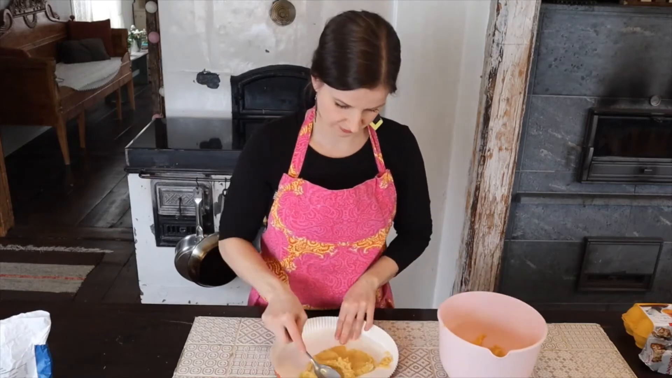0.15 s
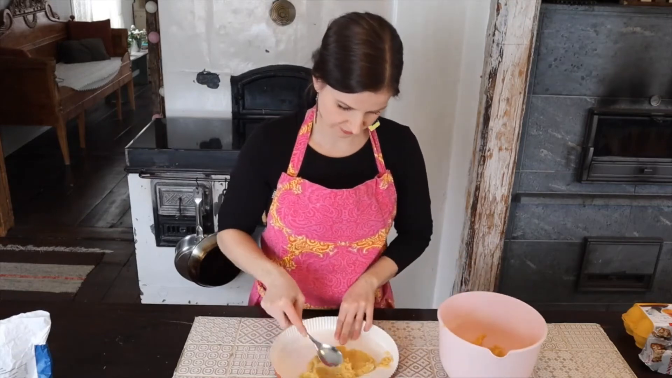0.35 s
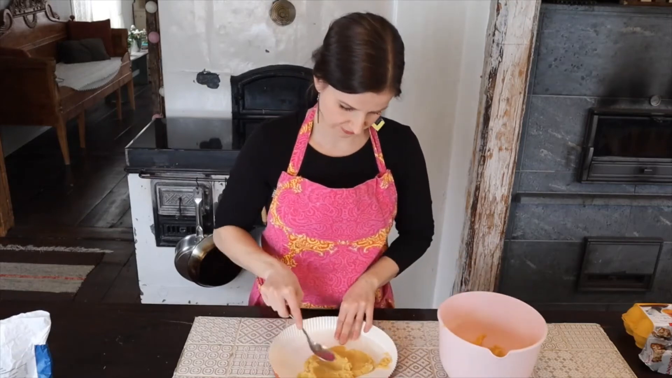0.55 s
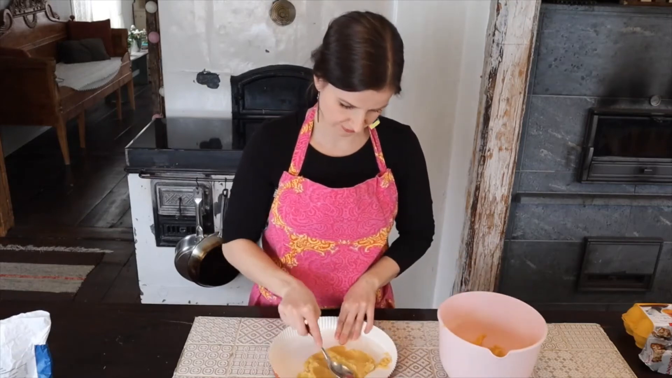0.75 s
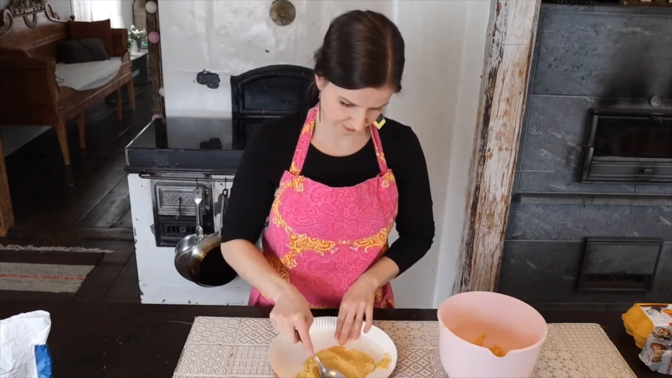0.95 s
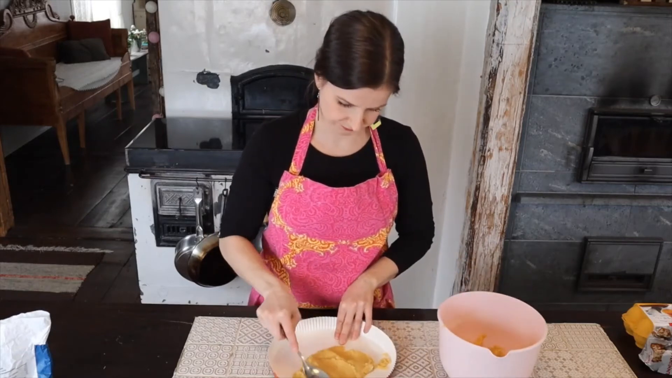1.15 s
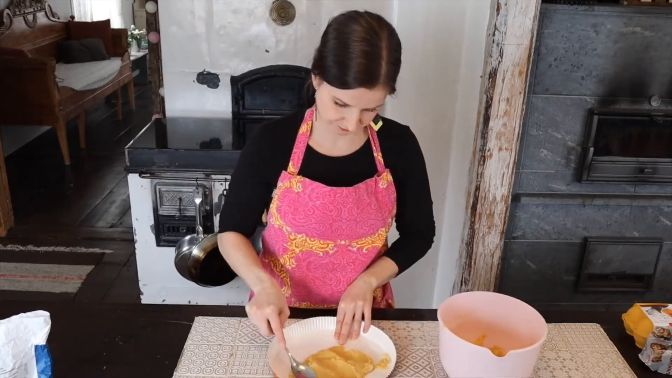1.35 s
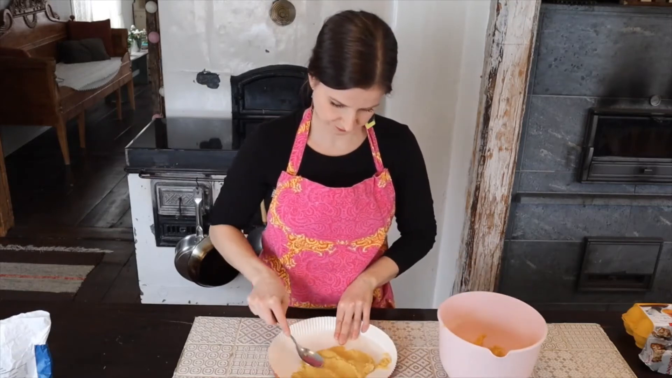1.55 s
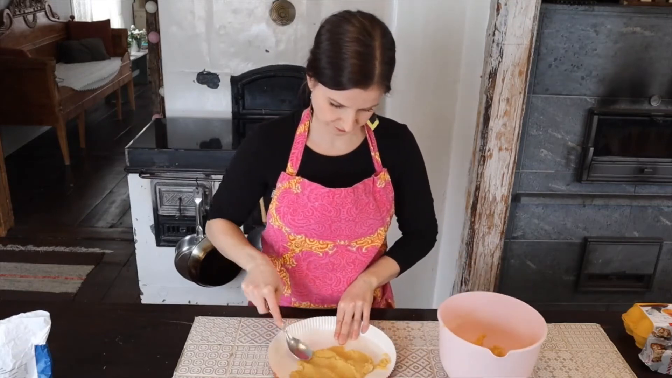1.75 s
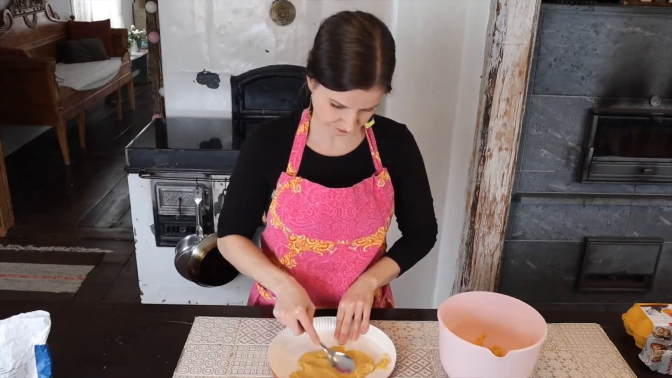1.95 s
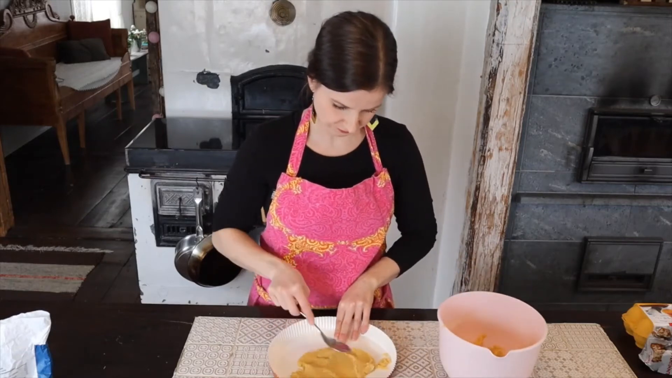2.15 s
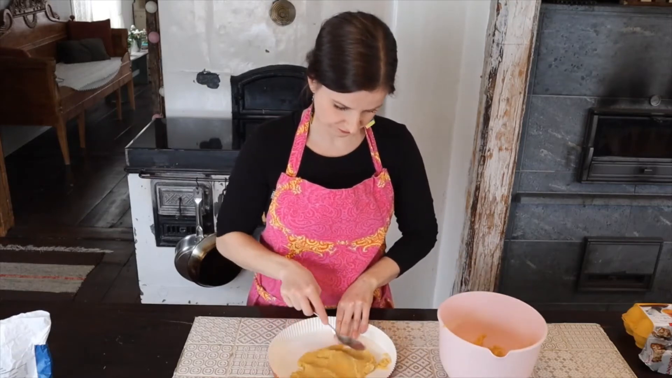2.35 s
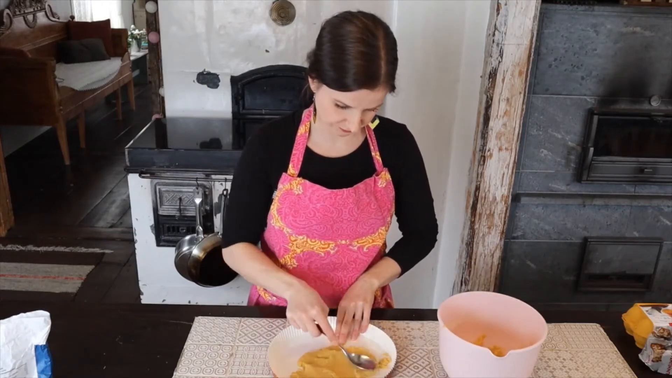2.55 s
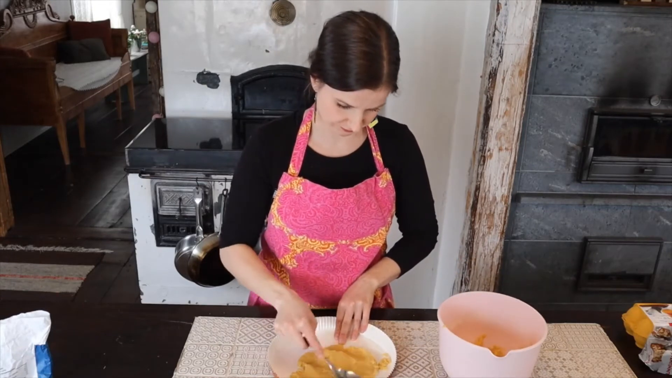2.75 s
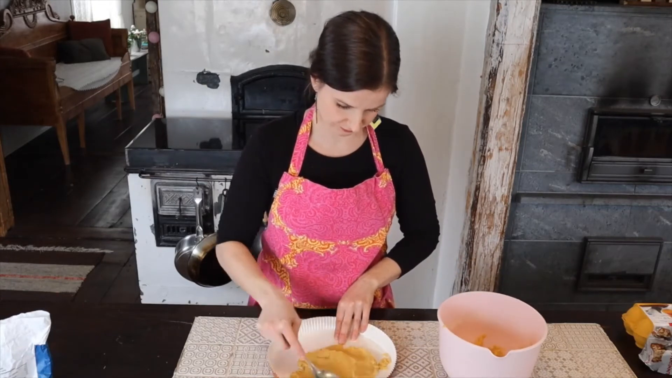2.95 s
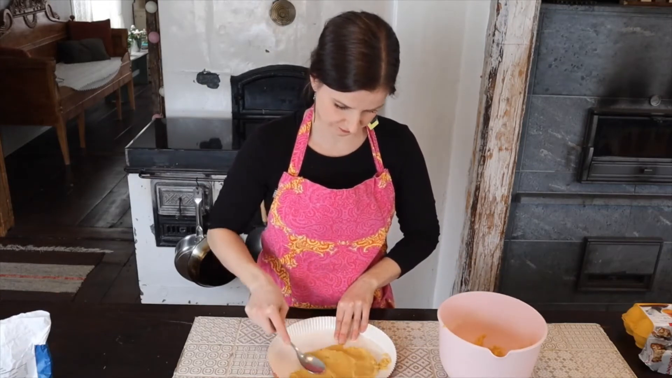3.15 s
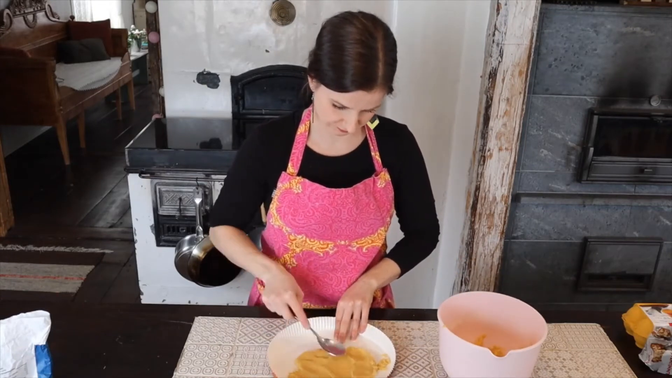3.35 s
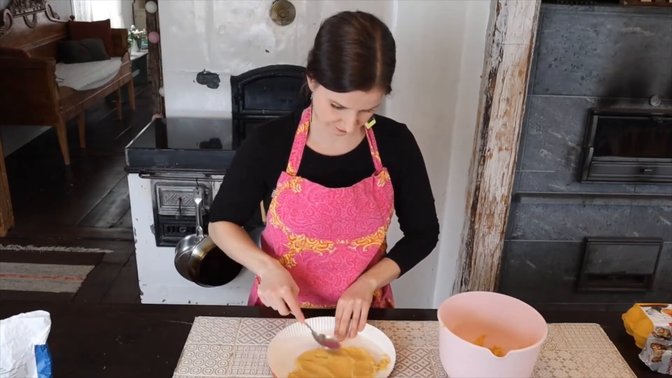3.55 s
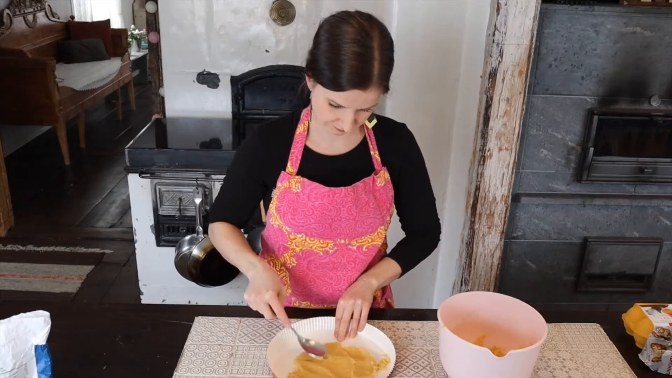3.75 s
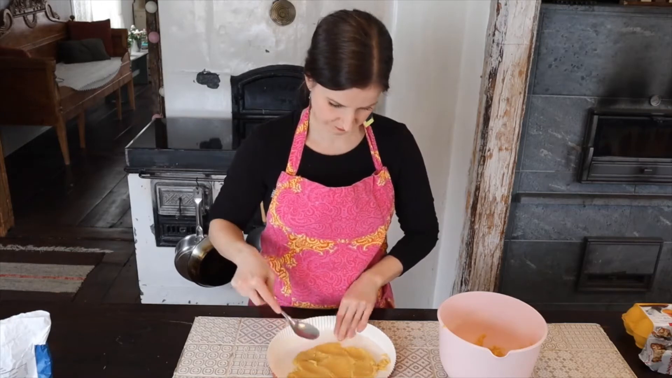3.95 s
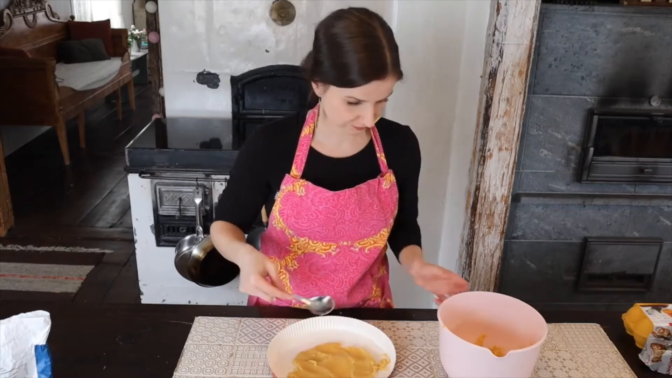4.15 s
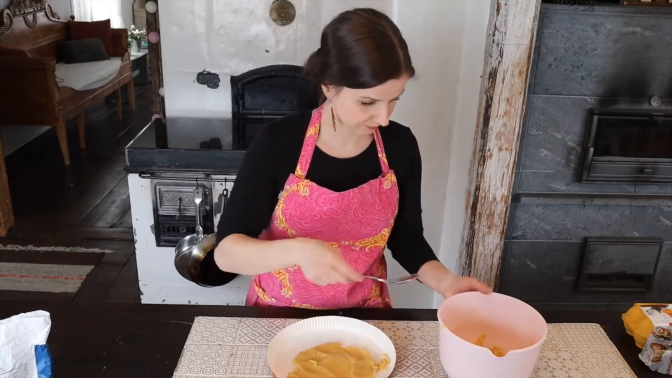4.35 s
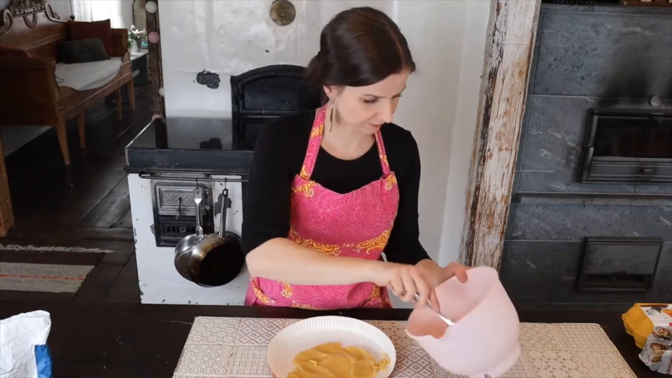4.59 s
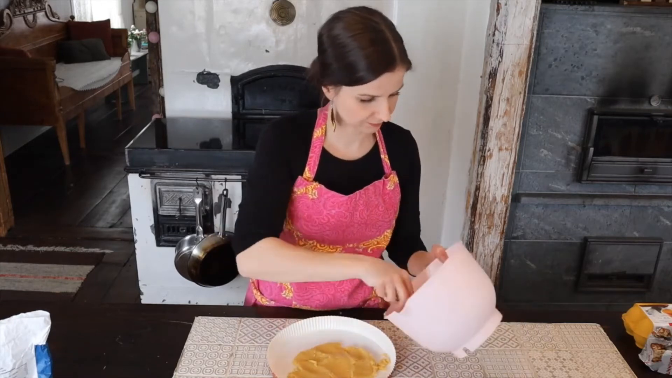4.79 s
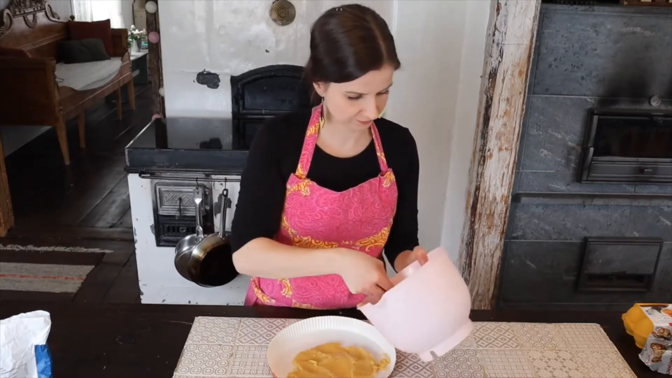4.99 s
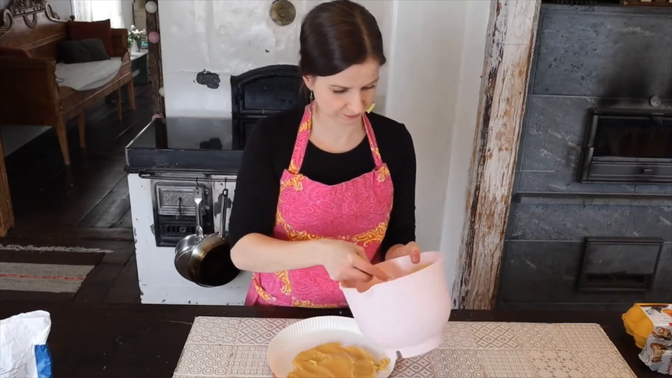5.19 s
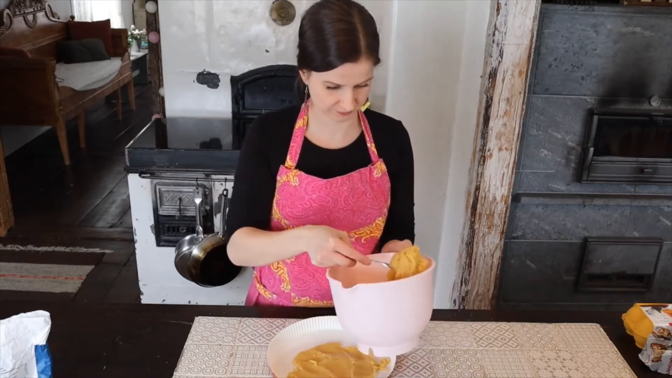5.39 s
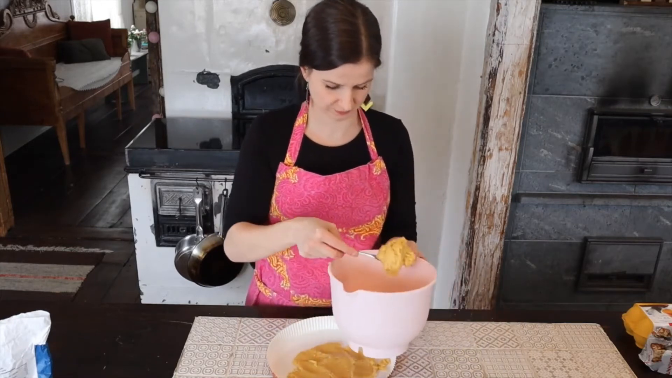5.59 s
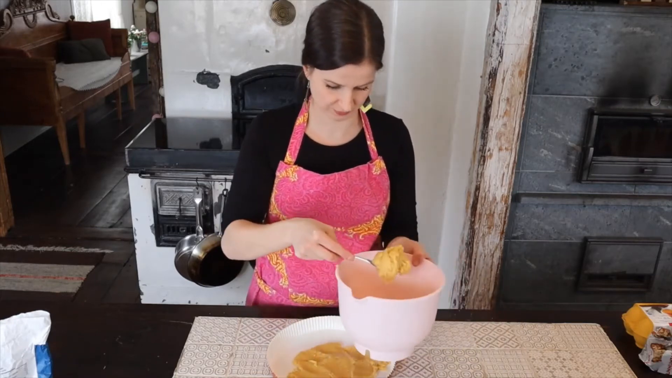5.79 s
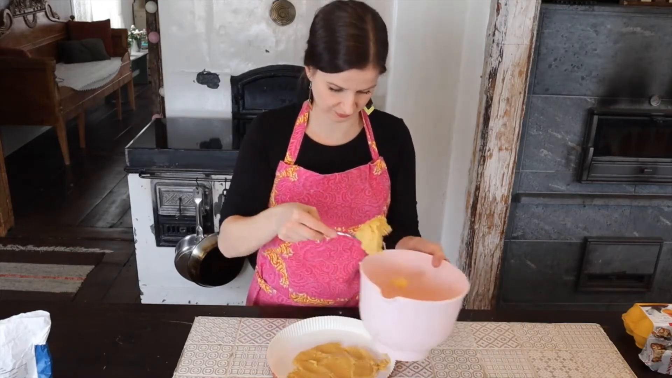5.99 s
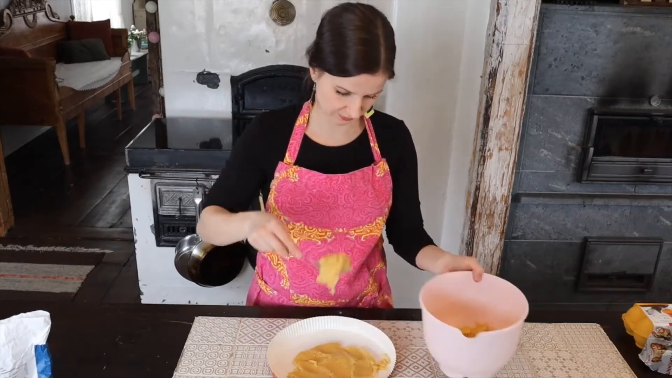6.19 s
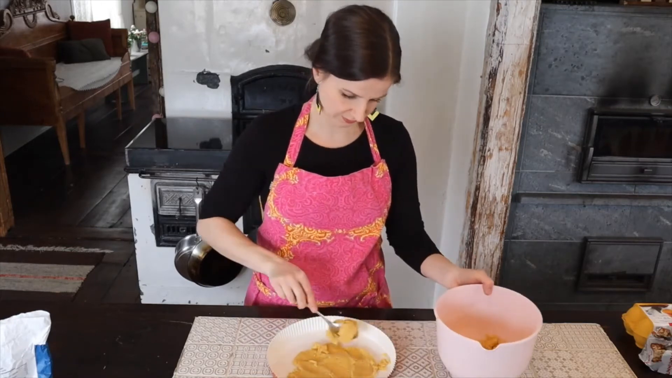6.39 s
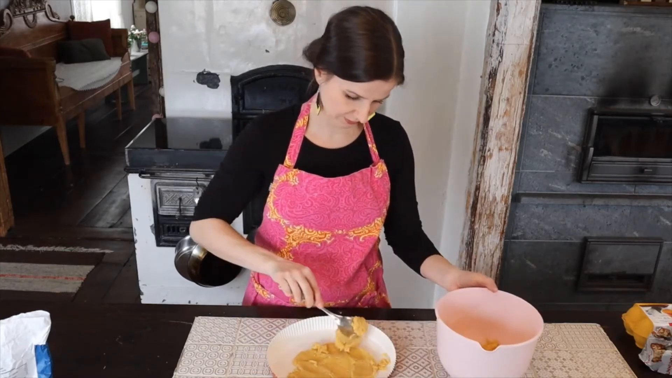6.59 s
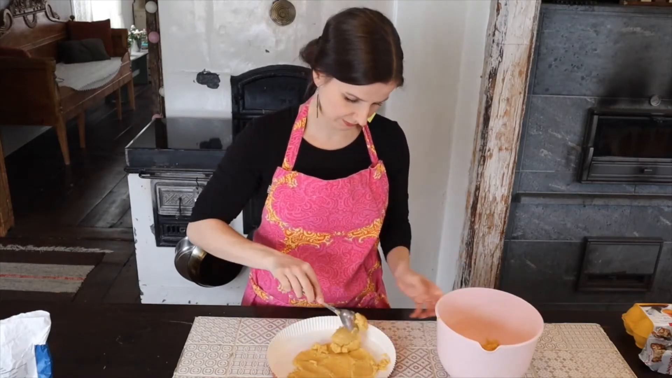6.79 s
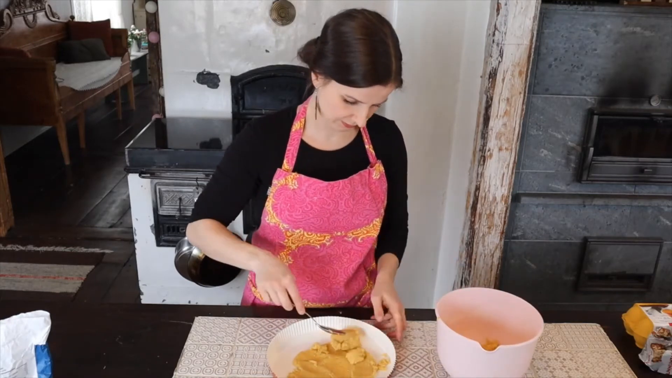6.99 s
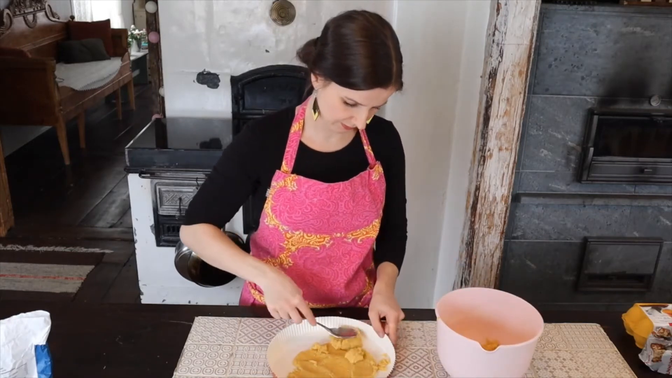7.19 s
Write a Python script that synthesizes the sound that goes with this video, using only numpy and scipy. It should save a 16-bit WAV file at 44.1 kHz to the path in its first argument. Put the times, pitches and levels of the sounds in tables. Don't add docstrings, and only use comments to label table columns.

```python
import sys
import numpy as np
from scipy import signal
from scipy.fft import rfft, irfft, next_fast_len
from scipy.io import wavfile
from scipy.ndimage import uniform_filter1d

SR = 44100
rng = np.random.default_rng(int(sys.argv[2]) if len(sys.argv) > 2 else 0)


def bounce(signal):
    frames = np.transpose(np.atleast_2d(signal))
    limited = np.clip(frames, -1, 1)
    pcm = np.round(limited * 32767).astype(np.int16)
    wavfile.write(sys.argv[1], SR, pcm)


def volts(x):
    e = np.asarray(x, float) / 20
    return 10 ** e


N = 318843
TIME = np.arange(N) / SR

# t/s, peak level/dB, body re peak/dB, click re peak/dB,
# share of the free ring time left by dough and hand/1
KNOCKS = [(0.2541, -32, 9.5, -6.5, 0.32), (0.6993, -44.5, -33, -8, 0.25), (0.8445, -32, -15, -0.5, 0.69),
          (0.849, -27, -10.5, -16, 0.47), (1.0832, -18, -8.5, -11.5, 0.78),
          (1.0924, -20.5, -10, -27.5, 0.86), (1.1065, -36, -16, -28, 0.39),
          (1.1215, -26.5, -0.5, -28.5, 0.38), (1.134, -30, -13, -28, 0.52), (1.1845, -28, -28, -40.5, 0.52),
          (1.503, -15.5, -32, -9.5, 0.017), (2.3659, -57.5, -19, 1.5, 1.4), (2.4541, -42, -8, -11, 0.19),
          (2.5882, -34, -2, 1, 0.27), (2.7334, -45.5, -38, 14, 0.42), (2.9132, -26.5, -10, -6.5, 0.4),
          (3.2999, -36.5, -4.5, -4, 0.37), (3.3184, -31, -10, -11, 0.2), (3.5413, -43, -7, -10, .32),
          (3.5883, -39.5, -16, -6, 0.16)]
# t/s, peak level/dB, f/Hz, decay time/s
STICKY_TICKS = [(0.4658, -49, 4200, 0.026), (0.779, -30, 5100, 0.2), (0.82, -30.5, 4000, 0.045),
                (1.0546, -34.5, 1640, 0.027), (1.488, -26.5, 2920, 0.02), (1.8297, -42.5, 2580, 0.04),
                (1.947, -59.5, 3540, 0.036), (2.0986, -52, 3210, 0.028), (2.346, -37, 7500, 0.41),
                (2.577, -33, 2450, 0.0088), (2.6956, -33.5, 4700, 0.014), (2.8923, -41.5, 3020, 0.019),
                (3.1365, -51.5, 2660, 0.045), (3.213, -35, 3980, 0.1), (3.238, -27.5, 4500, 0.032),
                (3.239, -30.5, 9000, .03), (3.377, -28.5, 3450, 0.085), (3.5253, -35, 3700, 0.085),
                (3.526, -50, 8900, .03), (3.968, -38, 7300, 0.043), (2.4545, -45, 8650, 0.068),
                (2.243, -45.5, 9300, 0.2), (2.611, -32, 5000, .04), (2.7325, -55, 5000, 0.035),
                (3.54, -40, 7000, 0.067), (3.739, -38, 8800, 0.049), (3.7922, -42.5, 2530, 0.039),
                (3.8876, -35.5, 11900, 0.056), (3.969, -28.5, 2760, 0.037), (4.3358, -41.5, 3220, 0.02),
                (4.468, -32, 2300, 0.054), (5.907, -55.5, 10920, 0.032), (6.5178, -35.5, 2580, 0.013),
                (6.8524, -42, 11630, 0.046), (7.1738, -57.5, 3360, 0.035), (7.1971, -30, 3500, 0.074),
                (7.208, -29, 3550, 0.06)]
# t/s, peak level/dB, f/Hz, T60/s
PINGS = [
    (.697, -51, 4680, .04),
    (1.267, -38, 3450, 0.0085),
    (2.894, -40.5, 2930, 0.018),
    (5.9659, -44, 3780, 0.018),
    (6.016, -64, 4420, 0.028),
    (5.9667, -53.5, 7150, 0.012),
    (5.9665, -59, 11500, .013),
    (5.9665, -61, 9450, 0.012),
    (5.967, -54.5, 1400, 0.017),
]
# t/s, hold/s, dish ring level/dB, hiss level/dB, dull body level/dB
JABS = [
    (.254, 0.0015, -39.5, -32.5, -36),
    (.848, 0.0021, -35, -47.5, -40.5),
    (1.5, 0.047, -32, -36, -37),
    (2.589, 0.037, -36, -40.5, -36.5),
    (2.913, 0.004, -34.5, -47, -37),
    (3.969, 0.0019, -77, -54, -56),
]
# t of full force/s, hold/s, dish ring/dB, hiss/dB, dull body/dB
SCRAPES = [
    (1.084, 0.02, -22, -35.5, -35.5),
    (1.306, 0.026, -31, -29, -31),
    (1.55, 0.048, -38.5, -34, -44),
    (1.675, 0.0023, -53, -55, -56),
    (3.32, 0.014, -42.5, -52.5, -49),
    (3.39, 0.0031, -82, -54, -62),
    (3.595, 0.0045, -53, -53, -56.5),
    (3.805, 0.0036, -57, -82, -57.5),
]
# t of full speed/s, rise/s, hold/s, hiss level/dB, dish ring re hiss/dB
SWIPES = [(0.137, 0.022, 0.089, -39.5, -17.5), (0.507, 0.023, 0.051, -39.5, -17),
          (0.692, 0.022, 0.0078, -63, 1), (0.758, 0.027, 0.0088, -58, -8), (0.826, 0.025, 0.0022, -39, -5),
          (0.993, 0.03, 0.0023, -41.5, -25), (1.138, 0.017, 0.14, -61, -14),
          (0.052, 0.058, 0.099, -63.5, -19), (1.744, 0.019, 0.067, -69.5, -9), (1.835, .02, .08, -73, 0),
          (2.038, 0.026, 0.043, -71, -12), (2.474, 0.05, 0.072, -70, -14), (1.502, 0.018, 0.0014, -35, -7),
          (1.944, 0.0054, 0.049, -57, -6.5), (2.24, 0.0046, 0.0089, -56.5, -17),
          (2.371, 0.058, 0.014, -53.5, -3), (2.586, 0.055, .002, -52.5, -6),
          (2.744, 0.061, .003, -43.5, -1.5), (2.898, 0.019, .002, -69, 17.5),
          (3.228, 0.035, 0.035, -42.5, -20), (3.296, .04, .04, -46.5, -16), (3.371, .04, 0.033, -50, -14),
          (3.524, 0.02, 0.042, -59.5, 3), (3.738, 0.084, 0.015, -58, -2.5), (3.905, 0.029, .02, -63.5, 2),
          (3.945, 0.1, .002, -60, -7), (7.225, 0.16, .03, -55, -0.5)]
# t/s, length/s,
# peak level/dB, f/Hz, width/Hz
CHAFES = [(0.259, .05, -42, 1000, 300), (.502, .03, -34, 4000, 900), (.521, .11, -41, 1900, 250),
          (.696, 0.0076, -45, 6600, 700), (0.853, 0.16, -37.5, 1805, 201), (1.102, 0.12, -26, 1890, 320),
          (1.301, 0.098, -34.5, 1350, 500), (2.246, .05, -53.5, 2300, 350), (2.362, 0.08, -40.5, 1930, 350),
          (2.59, 0.08, -39.5, 1400, 500), (2.721, .06, -43.5, 463, 350), (2.912, 0.025, -36, 565, 251.5),
          (2.917, 0.11, -36.5, 1820, 260), (3.134, 0.038, -56, 236, 70), (3.301, 0.047, -41.5, 1102, 400),
          (3.536, .03, -51, 1850, 300), (3.579, .076, -52, 235, 70), (3.586, 0.011, -41, 6660, 1200),
          (3.588, 0.027, -45, 2730, 300), (3.784, 0.037, -52, 233, 70)]
# t/s, level/dB
LEANS = [(0.254, -63.5), (.43, -82.5), (.85, -70.5), (.94, -78.5), (1.1, -58.5), (1.316, -51.5),
         (1.58, -82.5), (1.95, -74.5), (2.24, -80), (2.44, -71), (2.635, -64), (2.911, -69), (3.154, -74.5),
         (3.39, -68.5), (3.6, -70.5), (3.81, -64.5), (6.64, -67.5)]
# f/Hz, level/dB, T60/s
DISH_MODES = [(1314, -6, .06), (1492, -2, 0.13), (1551, 1, 0.088), (1708, 0.5, 0.087), (1752, 3.5, 0.22),
              (1830, 6.5, 0.6), (1855, 6.5, 0.39), (1928, 7.5, 0.51), (2040, 3.5, 0.17), (2082, 1, 0.047),
              (2265, -5, 0.098), (2435, -13, 0.11), (2580, -13, 0.078), (3450, -44, 0.037)]
# f/Hz, level/dB, T60/s
BOARD_MODES = [(235, -9, 0.17), (317.6, -6, 0.066), (445, -2.5, 0.12), (585.5, -2, 0.15), (718, 2.5, 0.083),
               (885, 3.5, 0.08), (920, -7.5, 0.02), (950, -15, 0.036)]
# f/Hz, density level/dB
RUB_SPECTRUM = [(880, -56.5), (1500, -18.5), (1850, 4), (2930, 1), (3980, 0), (6940, -4), (11300, -8.5),
                (12800, -7), (14800, -41)]
# f/Hz, density level/dB
GRIND_SPECTRUM = [(500, -27.5), (1100, -8), (2200, 2.5), (4000, -4), (8000, -13.5), (12500, -21.5),
                  (14800, -40)]
# f/Hz, density level/dB
PRESS_SPECTRUM = [(20, -14.5), (35, -11.5), (55, 1.5), (90, 0), (150, -8.5), (200, -11.5), (240, -2.5),
                  (310, -30.5)]

# t of full force/s, hold/s, wall/dB, hiss/dB, hollow/dB
DRAG = [
    (4.339, 0.036, -53, -52.5, -78),
    (4.4, 0.099, -67, -67, -64),
    (4.472, 0.0083, -54, -49, -66),
    (4.672, 0.015, -25.5, -31, -27),
    (4.74, 0.0091, -50, -64.5, -47),
    (4.8, 0.068, -35, -43, -42),
    (4.9, 0.075, -43, -43, -44),
    (5.03, 0.018, -45, -38.5, -73),
    (5.09, 0.0059, -57, -50, -76),
    (5.2, 0.1, -66, -79, -70),
]
# t of full force/s, hold/s, wall/dB, hiss/dB, hollow/dB
SETTLE = [
    (6.303, 0.014, -30.5, -49.5, -16.5),
    (6.4965, 0.0067, -36.5, -49, -26),
    (6.413, 0.012, -50, -61, -29),
    (6.428, 0.048, -30.5, -40.5, -33.5),
    (6.522, 0.0098, -36.5, -68, -31.5),
    (6.56, 0.027, -48.5, -78.5, -47),
    (6.61, 0.008, -59, -62.5, -54.5),
]
# t/s, peak level/dB, wall re peak/dB
BUMPS = [(6.302, -24.5, -2.5), (6.3055, -15, -7), (6.3112, -11.5, -6.5), (6.324, -20.5, -8),
         (6.335, -15, -6), (6.431, -21.5, 2), (6.4949, -11.5, -9), (6.4985, -15, -9), (6.518, -17, 0),
         (6.524, -13, -11), (6.549, -13.5, -5)]
# t/s, length/s, peak level/dB, f/Hz, width/Hz
SCUFFS = [(4.333, 0.031, -33.5, 3320, 900), (4.343, 0.038, -31, 2780, 502),
          (4.345, 0.057, -41.5, 2086, 400), (4.385, .06, -55, 560, 150), (4.446, 0.057, -38, 3670, 500),
          (4.468, 0.052, -35, 2300, 460), (4.472, 0.045, -44, 2770, 394), (4.671, .04, -26.5, 700, 200),
          (4.675, 0.049, -28, 339, 158.5), (4.782, 0.11, -24.5, 2880, 698),
          (4.903, 0.061, -36.5, 2630, 900), (4.904, .05, -36.5, 520, 90), (4.947, 0.027, -33, 3850, 900),
          (5.011, 0.014, -31, 3000, 1485), (5.026, .04, -34, 4740, 1535), (5.092, 0.025, -37.5, 2780, 1000),
          (6.302, 0.036, -36, 3500, 996), (6.305, 0.067, -33.5, 2150, 199), (6.422, 0.047, -32, 3540, 1200),
          (6.428, 0.047, -25, 257.6, 90), (6.498, 0.016, -27, 280, 150), (6.512, 0.013, -28.5, 3270, 1490),
          (6.521, 0.064, -25, 260, 90.2), (6.589, 0.027, -35, 576, 120), (6.631, 0.029, -41.5, 540, 120)]
# f/Hz, level/dB, T60/s
HELD_WALL_MODES = [(1400, -4, 0.053), (1910, 1.5, 0.034), (2104, 1, 0.027), (2450, -1.5, 0.11),
                   (2660, -1, 0.052), (3350, 1, 0.025), (3700, -27, 0.028)]
# f/Hz, level/dB, T60/s
STANDING_WALL_MODES = [(1025, 2, 0.0074), (1500, 0, 0.11), (1684, 5.5, 0.041), (1900, 2, 0.065),
                       (1980, -10, 0.11), (2066, 5, 0.043), (2300, 1, 0.28), (2480, 1.5, 0.035),
                       (3140, 2, 0.0027)]
# f/Hz, level/dB, T60/s
TILTED_AIR_MODES = [(325, -15.5, 0.073), (426.1, -8, 0.17), (520, -1.5, 0.095), (580, -4, 0.093),
                    (686, -2.5, 0.092), (809, -8, 0.11), (900, -9, 0.076)]
# f/Hz, level/dB, T60/s
HOLLOW_MODES = [(247.6, -15, 0.12), (330, -13, 0.099), (430, -3.5, 0.09), (485, -4, 0.14),
                (548.5, -0.5, 0.12), (627, -7, 0.065), (683, -14, 0.071), (830, -14.5, 0.068),
                (942.6, -18, 0.096)]
# f/Hz, density level/dB
SLIDE_SPECTRUM = [(1760, -38.5), (3000, 1), (4820, -6.5), (6420, -12), (11400, -20), (13300, -24.5),
                  (13700, -56.5), (14800, -77)]
# f/Hz, density level/dB
THUD_SPECTRUM = [(25, -17), (40, -21.5), (70, 8.5), (110, 6), (170, 2.5), (260, -45.5)]

# f/Hz, density level/dB
KITCHEN_SPECTRUM = [(20, -51.5), (88, -13.5), (308, -6.5), (569, -9), (1080, -14.5), (1900, -17.5),
                    (9140, -40), (14800, -53.5)]
# f/Hz, width/Hz, level re air/dB
FRIDGE_HUM = (143, 15, -12)
# t/s, level/dB
BACKGROUND_GAIN = [(0, -61), (0.398, -62), (2.201, -64), (3.101, -62.5), (4.2, -64.5), (4.601, -62),
                   (5.4, -64), (5.75, -70), (6.25, -68.5), (6.751, -62.5), (7.099, -65.5), (7.23, -62)]
# f/Hz, level/dB
STEREO_WIDTH = [(60, -6.5), (250, -7), (600, -5), (1100, 3), (2300, 6.5), (14300, 9.5)]
# f/Hz, level/dB
AIR_WIDTH = [(60, -12), (250, -0.5), (600, 0.5), (1100, 2.5), (2300, 4), (14300, 2.5)]
# f/Hz, share/1
LEFT_SHARE = [(250, .0), (550, 0.1), (1100, 0.02), (2000, -0.11), (4000, -0.02)]
# f/Hz, level/dB
MIC_RESPONSE = [(20, 1), (11500, -2.5), (13500, -9), (15000, -26), (22050, -60)]

RESTING_S = 4.22
REST_RING_DB, REST_HISS_DB, REST_BODY_DB, REST_TABLE_DB = -85, -79.5, -71.5, -92
RISE_DB = 30
DOUGH_GRIP_HZ, HAND_GRIP_HZ = 380, 130
PING_RISE_S = 0.0013
CHAFE_RISE = 0.11
ROOM_T60_S, ROOM_DB, FIRST_ECHO_S = 0.32, -13.5, 0.006


def spoon():
    rubs = friction(strokes(), DISH_MODES, [RUB_SPECTRUM, GRIND_SPECTRUM], BOARD_MODES, PRESS_SPECTRUM,
                    rate_hz=440.0, spread_db=3.0, damp=0.27, grip_hz=DOUGH_GRIP_HZ)
    rings = [(s, blow(db + 4.5, DISH_MODES, 0.00012, free)) for s, db, _, _, free in KNOCKS]
    thumps = [(s, blow(db + body + 1.0, BOARD_MODES, 0.0004, 0.51)) for s, db, body, _, _ in KNOCKS]
    cracks = [(s, click(db + crack + 8.0, 4100.0, 0.0061)) for s, db, _, crack, _ in KNOCKS]
    ticks = [(s, click(db, hz, t60)) for s, db, hz, t60 in STICKY_TICKS]
    pings = [(s, ping(db, hz, t60)) for s, db, hz, t60 in PINGS]
    chafes = [(s, chafe(db, length, hz, width)) for s, length, db, hz, width in CHAFES + SCUFFS]
    return rubs + place(rings + thumps + cracks + ticks + pings + chafes)


def strokes():
    jab = forces(JABS, 0.003, sag=[20, 120, 50], fall=[230, 330, 330])
    scrape = forces(SCRAPES, 0.024, sag=[20, 120, 50], fall=[230, 330, 330])
    dig_ring, grinding, dig_body = jab + scrape
    hiss = sum(swell(s, rise, hold, db, 64.6, 360) for s, rise, hold, db, _ in SWIPES)
    dish = sum(swell(s, rise, hold, db + re, 30, 232.7) for s, rise, hold, db, re in SWIPES)
    lean = sum(swell(s, 0.084, 0.007, db, 30, 220) for s, db in LEANS)

    def rest(db):
        return swell(0, 0.01, RESTING_S, db, 0.36, 120)

    ring_gain = dig_ring + dish + rest(REST_RING_DB)
    body_gain = dig_body + volts(-22.5) * hiss + rest(REST_BODY_DB)
    return [ring_gain, body_gain, lean + rest(REST_TABLE_DB), hiss + rest(REST_HISS_DB), grinding]


def click(db, hz, t60):
    t = np.arange(int(0.08 * SR)) / SR
    fade = np.exp(-t / 0.00063) + 0.35 * np.exp(-np.log(1000) * t / max(t60, 0.003))
    band = [(hz / 3, -30), (hz * 0.7, -10), (hz, 0), (hz * 1.4, -9), (hz * 4, -22)]
    burst = colour(rng.standard_normal((2, len(t))) * fade, band)
    return volts(db) * burst / np.abs(burst[0]).max()


def ping(db, hz, t60):
    t = np.arange(int(0.08 * SR)) / SR
    waver = np.cumsum(rng.standard_normal(len(t))) * 0.089
    rise = 1 - np.exp(-(t / PING_RISE_S) ** 2)
    decay = np.exp(-np.log(1000) * t / max(t60, 0.003))
    tone = np.sin(2 * np.pi * hz * t + waver) * rise * decay
    return volts(db) * tone / np.abs(tone).max()


def chafe(db, length, hz, width):
    t = np.arange(int(0.25 * SR)) / SR / max(length, 0.003)
    envelope = (1 - np.exp(-t / CHAFE_RISE)) * np.exp(-2 * t ** 1.7)
    burst = rng.standard_normal((2, len(t))) * envelope
    burst = shape(burst, lambda f: 1 / (1 + 1j * (f - hz) / (width / 2)) ** 2)
    return volts(db) * burst / np.abs(burst).max()


def bowl():
    jerk = forces(DRAG[:4], 0.011, sag=[45, 15, 25], fall=[210, 280, 230])
    haul = forces(DRAG[4:], 0.082, sag=[30, 15, 25], fall=[200, 250, 200])
    held_wall, held_hiss, held_air = jerk + haul
    land = forces(SETTLE[:2], 0.0035, sag=[10, 300, 100], fall=[210, 300, 220])
    rock = forces(SETTLE[2:], 0.023, sag=[40, 40, 100], fall=[300, 300, 300])
    down_wall, down_hiss, down_air = land + rock
    arm = swell(4.42, 0.021, 0.2, -83.5, 2.4, 150)
    arm = arm + swell(4.68, 0.02, 0.03, -73, 30, 300)
    arm = arm + swell(4.5, 0.06, 0.071, -81.5, 5, 150)
    held = friction([held_wall, held_air, arm, held_hiss], HELD_WALL_MODES, [SLIDE_SPECTRUM],
                    TILTED_AIR_MODES, THUD_SPECTRUM,
                    rate_hz=130.0, spread_db=2.0, damp=0.47, grip_hz=HAND_GRIP_HZ)
    down = friction([down_wall, down_air, volts(-29.0) * down_air, down_hiss], STANDING_WALL_MODES,
                    [SLIDE_SPECTRUM], HOLLOW_MODES, THUD_SPECTRUM,
                    rate_hz=170.0, spread_db=1.5, damp=0.51, grip_hz=HAND_GRIP_HZ)
    booms = [(s, blow(db - 4.5, HOLLOW_MODES, 0.0007, 0.41)) for s, db, _ in BUMPS]
    raps = [(s, blow(db + wall - 20.5, STANDING_WALL_MODES, 0.00011, 0.8)) for s, db, wall in BUMPS]
    return held + down + place(booms + raps)


def friction(gain, high, hiss, low, table, rate_hz, spread_db, damp, grip_hz):
    force = grit(rate_hz, spread_db)
    upper = ring(force, high, damp, grip_hz=grip_hz)
    lower = ring(force, low, damp)
    shake = colour(rng.standard_normal((2, N)), table)
    parts = [upper, lower, shake] + [colour(force, points) for points in hiss]
    return sum(g * unit(part) for g, part in zip(gain, parts))


def grit(rate_hz, spread_db):
    hold = int(SR / rate_hz)
    catch = np.minimum(rng.exponential(size=N // hold + 1), 2.4)
    catch = np.repeat(catch, hold)[:N]
    strength = uniform_filter1d(volts(spread_db * catch), hold)
    return unit(rng.standard_normal((2, N)) * strength)


def blow(db, modes, push_s, damp):
    push = np.pad(np.hanning(int(push_s * SR) + 3), (0, int(0.45 * SR)))
    spot = 1.5 * rng.standard_normal(len(modes))
    struck = [(hz * (1 + 0.006 * e), level + e, t60) for (hz, level, t60), e in zip(modes, spot)]
    sound = ring(push, struck, damp, sense=0.86)
    return volts(db) * sound / np.abs(sound).max()


def ring(x, modes, damp=0.91, sense=-1, grip_hz=0):
    def response(f):
        body = 0
        for k, (hz, db, t60) in enumerate(modes):
            loss_hz = grip_hz + np.log(1000) / (np.pi * damp * t60)
            body = body + sense ** k * volts(db) * 1j * f / (hz ** 2 - f ** 2 + 1j * f * loss_hz)
        low_hz, high_hz = modes[0][0] / 2, 1.5 * modes[-1][0]
        return body * (1j * f / (low_hz + 1j * f)) ** 2 / (1 + 1j * f / high_hz) ** 2
    return shape(x, response)


def swell(s, rise_s, hold_s, db, sag, fall):
    out = np.zeros(N)
    first = max(int((s - 2 * rise_s) * SR), 0)
    heard = slice(first, int((s + hold_s + 2 * RISE_DB / fall) * SR))
    t = TIME[heard] - s
    held = np.clip(t, 0, max(hold_s, 0))
    rise = RISE_DB * np.minimum(t, 0) / max(rise_s, 0.001)
    out[heard] = volts(db + rise - sag * held - fall * (np.maximum(t, 0) - held))
    return out


def forces(rows, rise_s, sag, fall):
    return np.array([sum(swell(s, rise_s, hold, db[k], sag[k], fall[k]) for s, hold, *db in rows)
                     for k in range(3)])


def place(events):
    out = np.zeros((2, N + SR))
    for s, sound in events:
        start = int(s * SR)
        out[:, start:start + sound.shape[-1]] += sound
    return out[:, :N]


def unit(x):
    return x / np.sqrt(np.mean(x ** 2, axis=-1, keepdims=True))


def colour(x, points):
    hz, db = np.transpose(points)
    return shape(x, lambda f: volts(np.interp(np.log(f + 1), np.log(hz + 1), db)))


def shape(x, response):
    size = next_fast_len(x.shape[-1] + 8192)
    f = np.arange(size // 2 + 1) * SR / size
    return irfft(rfft(x, size) * response(f), size)[..., :x.shape[-1]]


def echoes(t60):
    t = np.arange(int(0.5 * SR)) / SR
    decay_s = np.array([[t60], [0.64 * t60]])
    low, high = rng.standard_normal((2, len(t))) * np.exp(-np.log(1000) * t / decay_s)
    tail = colour(low, [(20, -9), (2500, -6.5), (5000, -18.0)])
    tail = tail + colour(high, [(1500, 5.8), (4000, 1.7), (20000, 0.69)])
    return tail / np.sqrt(np.sum(tail ** 2))


def kitchen():
    s, db = np.transpose(BACKGROUND_GAIN)
    hz, width, hum_db = FRIDGE_HUM
    hum_band = [(hz - 2 * width, -40), (hz, 0), (hz + 2 * width, -40)]
    air = unit(colour(rng.standard_normal((2, N)), KITCHEN_SPECTRUM))
    hum = unit(colour(rng.standard_normal((2, N)), hum_band))
    return (air + hum * volts(hum_db)) * volts(np.interp(TIME, s, db))


def scene():
    near, scattered = spoon() + bowl()
    late = np.pad(near, (int(FIRST_ECHO_S * SR), 0))[:N]
    room_mid = signal.fftconvolve(late, echoes(ROOM_T60_S))[:N] * volts(ROOM_DB)
    room_side = signal.fftconvolve(late, echoes(ROOM_T60_S))[:N] * volts(ROOM_DB)
    air_mid, air_side = kitchen()
    turned = shape(volts(-19.5) * near + volts(-8.0) * scattered, lambda f: 1j + 0 * f)
    leaning = shape(near, lambda f: np.interp(f, *np.transpose(LEFT_SHARE)))
    side = colour(turned + room_side, STEREO_WIDTH) + leaning + colour(air_side, AIR_WIDTH)
    mid = near + room_mid + air_mid
    return np.array([mid + side, mid - side]) * volts(np.array([[-0.2], [0.2]]))


def roll_off(x):
    return signal.sosfilt(signal.butter(12, 14930, fs=SR, output="sos"), x)


def record(dry):
    mix = colour(dry, MIC_RESPONSE)
    return roll_off(mix)


dry = scene()
out = record(dry)
bounce(out)
```